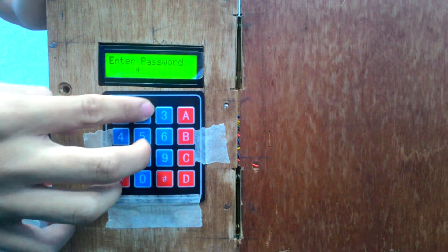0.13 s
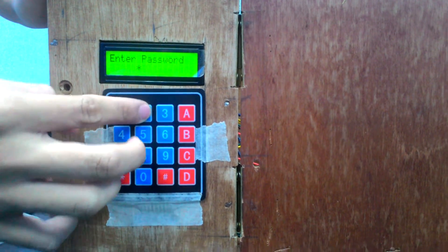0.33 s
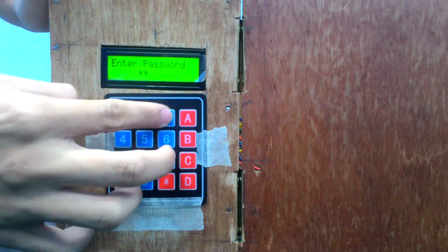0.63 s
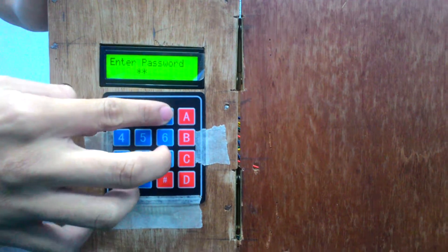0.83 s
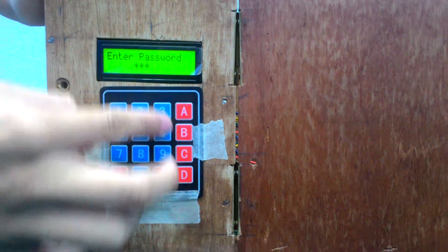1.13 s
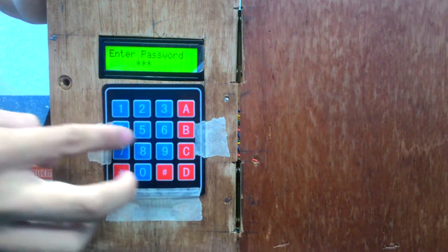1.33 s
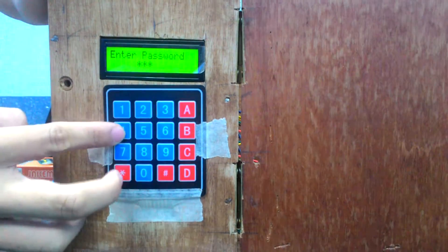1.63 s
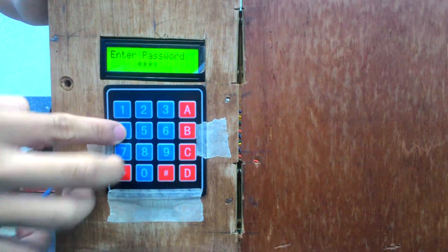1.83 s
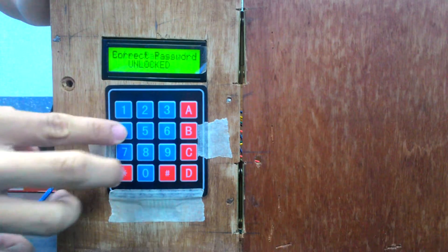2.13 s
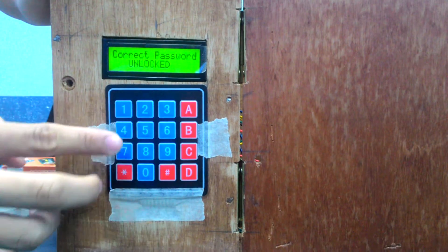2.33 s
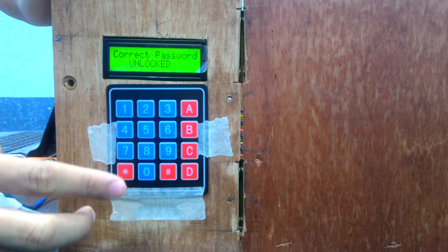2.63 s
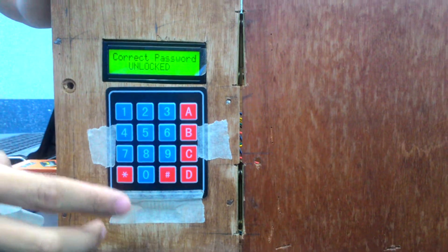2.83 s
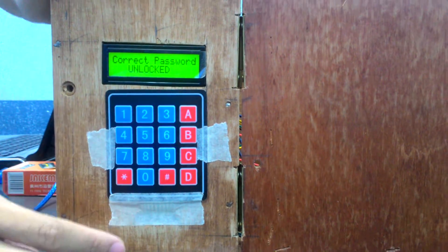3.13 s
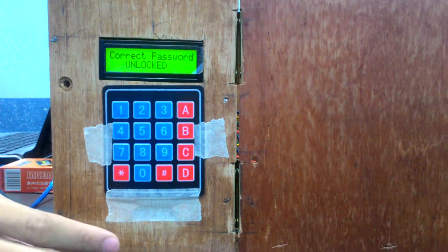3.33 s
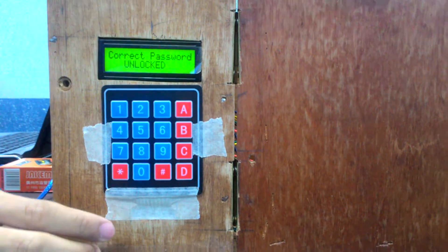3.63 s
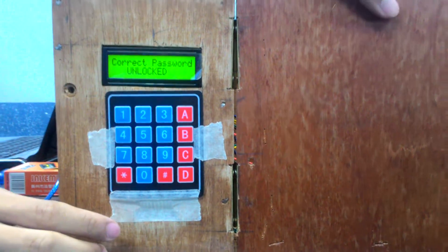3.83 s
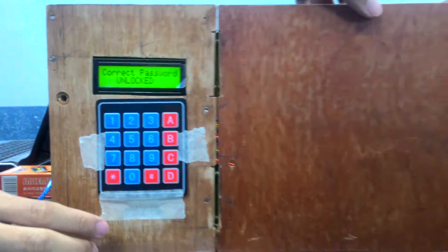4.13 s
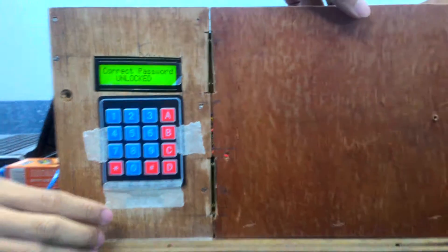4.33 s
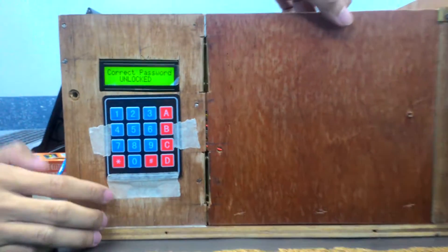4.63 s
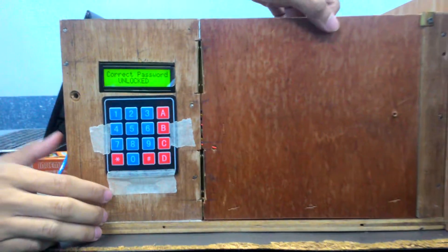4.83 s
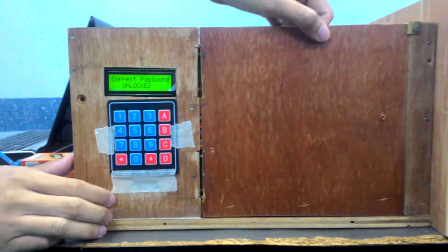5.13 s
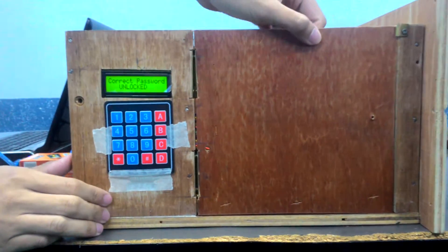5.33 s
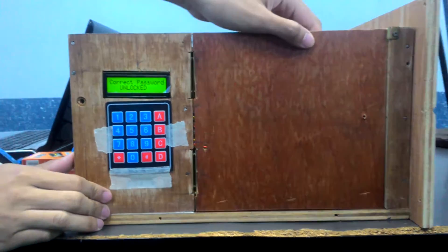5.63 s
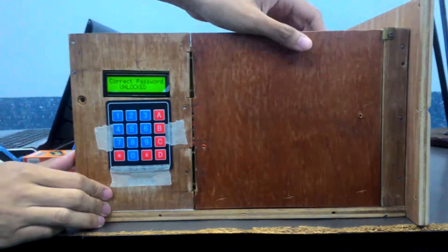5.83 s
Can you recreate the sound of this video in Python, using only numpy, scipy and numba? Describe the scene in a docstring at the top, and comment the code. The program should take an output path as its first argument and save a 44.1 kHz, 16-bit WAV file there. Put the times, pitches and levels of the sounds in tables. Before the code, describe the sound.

Faint finger ticks and rubs on a keypad, then a door is pulled and a small lock bolt snaps with a loud, sharp clack.

```python
"""Keypad and door lock

In a quiet, faintly humming room, fingers press a flat keypad taped to a plywood door and hands shift
over the wood. The door is pulled: a thin squeak, then the bolt of a small electric lock slides and slams
home. The sharp clack rings in the room, overloads the microphone and makes it turn its volume down."""
import sys
import numpy as np
from scipy import signal
from scipy.fft import rfft, irfft
from scipy.io import wavfile
from scipy.ndimage import uniform_filter1d
from numba import njit

SR = 44100
rng = np.random.default_rng(int(sys.argv[2]) if len(sys.argv) > 2 else 0)


def transcribe(u):
    """Save the signal u as a 16-bit wav file named by the first command-line argument.

    u: samples, shape (n,) or (channels, n), limited to [-1, 1]; the rate is SR.
    q: integer samples, one column per channel.
    """
    v = np.clip(np.atleast_2d(u).T, -1, 1)
    q = np.round(v * 32767).astype(np.int16)
    wavfile.write(sys.argv[1], SR, q)


N = 264600
TIME = np.arange(N) / SR

# Hum of the mains and a fan. Each row: pitch in Hz, average level in dB.
HUM_TONES = [(59, -64), (120, -62.5), (289, -76.5), (347, -70), (402, -73.5), (533, -71), (1201, -68.5)]
# The tone colours of the noises. Each row: frequency in Hz, relative level in dB.
AIR_COLOUR = [(20, -13), (45, -6.5), (90, -8), (200, -4), (300, -10.5), (650, -17.5), (850, -15.5),
              (2000, -21), (2900, -19.5), (3650, -11), (5500, -27.5), (6800, -21.5), (8300, -37.5),
              (11000, -38), (15500, -35.5)]
BUMP_COLOUR = [(40, -22.5), (80, 0.5), (120, -3), (220, 2), (320, -18), (600, -24.5), (1500, -39.5),
               (5000, -81.5)]
THUD_COLOUR = [(20, -10.5), (55, 9.5), (80, 5), (120, -13.5), (250, -29), (1500, -90)]
PALM_COLOUR = [(600, -60), (2000, -42), (3800, 3), (5300, -16), (6800, 5), (7500, -2), (8400, -23),
               (9600, -11.5), (11000, -33), (15000, -33.5)]
DRAG_COLOUR = [(300, -13), (1000, -4), (1800, -12.5), (2500, -6.5), (3600, 4.5), (5000, -26), (6600, -6.5),
               (8000, -33.5), (12000, -39.5)]
TICK_COLOUR = [(300, -15), (1000, -13.5), (2000, -11.5), (3700, 2), (5000, 1), (7000, -3), (9500, -13),
               (11500, -32), (15500, -37.5)]
FINGER_ECHO_COLOUR = [(100, -2.5), (700, -4), (3500, 0.5), (8000, -8), (15000, 4.5)]
CRACK_COLOUR = [(30, -21.5), (200, -12), (330, -42), (500, -15), (1000, -17), (1900, -14.5), (2600, -16),
                (3900, 3.5), (5400, -11.5), (7000, 0.5), (8200, -24.5), (10000, -20), (15000, -26.5)]
LOCK_ECHO_COLOUR = [(60, -13.5), (330, -9), (700, -7), (1150, -9), (1850, -12), (2350, 0), (3850, -2.5),
                    (4800, -3), (5200, 3), (5950, -2.5), (7100, -1.5), (7900, -5.5), (10100, 2),
                    (11200, -9.5), (15500, -4.5)]
# Hands rest on the plywood box to type, then grip its door.
# Each holds: start, end, rise time and fall time in seconds, level in dB.
TYPING_HOLD = (-0.5, 4, 0.5, 0.6, -57.5)
DOOR_HOLD = (4, 5.9, 0.3, .3, -55)
# Pushes rock the box on its table. Each row: start and length in seconds, level in dB, pitch in Hz.
BOX_PUSHES = [(0.031, .4, -48, 61), (.28, .24, -53, 150), (.621, .18, -57, 60), (1.64, .26, -53, 65),
              (1.954, .076, -50.5, 65), (2.279, .15, -51.5, 60), (2.42, .29, -52, 60), (2.5, .2, -56, 190),
              (2.843, .12, -58.5, 60), (3.49, .082, -53, 60), (3.759, .34, -51, 175),
              (4.19, .24, -46.5, 130), (4.53, .1, -46, 118), (5.08, .17, -52, 130)]
# Skin slips over keys and wood. Each row: start and length in seconds, level of the rasp in dB,
# then hiss and panel murmur in dB compared with the rasp.
SKIN_RUBS = [(.012, .072, -46, -4, -8), (.613, 0.039, -54, 2.5, -3), (1.175, 0.03, -53, -1, 1),
             (1.442, 0.024, -65, 3, -6), (1.527, 0.056, -63, -4, -4), (1.642, 0.048, -55, -2.5, -9),
             (2.031, .056, -54, -19, -7), (2.589, .1, -57, -14, 0), (3.32, .11, -50.5, -11, -6),
             (3.422, .016, -59, 13, -1), (5.968, .045, -43, 6, -1)]
# A finger scuffs the panel; the box and door creak and rub.
# Each row: start and length in seconds, level in dB, centre and width in Hz.
SCUFFS_AND_CREAKS = [(.4595, .009, -44, 4300, 2200), (.459, .035, -51, 850, 500),
                     (.618, .016, -44, 3640, 500), (2.12, .24, -71, 5280, 140),
                     (4.65, 0.28, -63.5, 2555, 120), (4.85, 0.29, -68, 960, 160),
                     (5.40, .14, -54, 5700, 600), (5.43, .11, -48.5, 4360, 700),
                     (5.43, 0.094, -60, 987, 160)]
# Where the plywood rings. Each row: pitch and width in Hz, strength in dB before dividing by the width.
PANEL_RESONANCES = [(176, 25, -2), (350, 57, -3), (797, 160, 10), (1120, 200, 6)]
# Fingers tick on keys and wood. Each row: start in seconds, level in dB,
# brightness in dB per octave, knock in dB compared with the tick.
FINGER_TICKS = [(.0453, -47, -5, -8), (.4612, -42, -4.5, 3), (.4655, -44, -5, 5), (.594, -44, -2, -3),
                (.6215, -47, -4, 4), (.640, -50, -4, 5), (.656, -49, -4, 6), (1.1797, -39, -.5, -5),
                (2.051, -52, 2, -3), (2.166, -49, 3, -19), (2.331, -56, 17, -20), (3.342, -46, -3, -6),
                (3.406, -45, 5, -20), (3.4302, -35, 4.5, -17), (4.109, -47.5, 10, -20),
                (5.023, -52, 5, -26), (5.2875, -47.5, 4, -15)]
# The pull on the door grows until the bolt gives. Each row: time in seconds, effort in dB.
DOOR_PULL = [(4.4, -30), (4.75, -13), (5.36, -11), (5.44, -3.5), (5.515, 1), (5.535, -13)]
# The bolt rasps in its sleeve. Each row: start and length in seconds, level in dB, centre and width in Hz.
BOLT_SLIDE = [(5.5180, 0.0061, -15.5, 3300, 2500), (5.5178, .0105, -18, 5900, 2800),
              (5.5178, 0.015, -32, 1000, 2200), (5.5170, 0.01494, -12, 3850, 390)]
# The bolt hits its stop and bounces. Each row: start in seconds, level in dB.
BOLT_BLOWS = [(5.5312, 14), (5.5358, 13), (5.5384, 7), (5.5438, -0.5), (5.5468, 9)]
# Bolt, frame and box ring. Each row: pitch in Hz, relative level in dB, seconds to fade by 60 dB.
LOCK_TONES = [(52, -5.5, 0.078), (182, -1, .1), (509, -9, .1), (686, -16, 0.18), (1110, -21, 0.5),
              (2390, -15, 0.5), (2880, -15, .45), (3200, -18.5, 0.39), (3320, -19, .48), (3590, 3.5, 0.19),
              (3630, -5.5, .35), (3710, 1, .3), (3810, -1, 0.64), (3917, -8, 0.54), (3830, -3, 0.57),
              (4200, -12.5, .4), (4510, 0, 0.47), (4385, -1, .42), (4562, -1.5, .4), (5100, -6, .42),
              (4830, -8.5, .45), (5454, -6, 0.38), (5660, -4, 0.51), (6230, -7, 0.36), (6820, -8, 0.34),
              (6890, -0.5, 0.416), (6970, -13, 0.21), (7050, -9, 0.52), (7365, -16, .42)]


def gain(db):
    """Turn decibels into a number to multiply by."""
    return 10 ** (np.asarray(db) / 20)


def normalise(x):
    """Scale x to an average (rms) size of 1."""
    return x / np.sqrt(np.mean(x ** 2))


def fade(seconds):
    """A one-second curve that drops by 60 dB in the given time."""
    return np.exp(-np.log(1000) * np.minimum(TIME[:SR] / seconds, 10))


def add(out, start, x):
    """Mix x into out, from start seconds on."""
    i = min(int(start * SR), N - 1)
    out[i:i + len(x)] += x[:N - i]


def tint(x, colour, tilt_db=0):
    """Give x a tone colour, made brighter by tilt_db per octave."""
    hz, db = np.transpose(colour)
    octave = np.log2(np.maximum(np.arange(len(x) // 2 + 1) * SR / len(x), 1))
    curve_db = np.interp(octave, np.log2(hz), db + tilt_db * np.log2(hz))
    return normalise(irfft(rfft(x) * gain(curve_db), len(x)))


def noise(colour, tilt_db=0, size=N):
    """Random noise with a tone colour."""
    return tint(rng.standard_normal(size), colour, tilt_db)


def wander(rate):
    """A drift that heads for a new random value rate times a second."""
    points = rng.standard_normal(1024)
    return np.interp(TIME * rate, np.arange(len(points)), points)


def grit(spread_db, size=N):
    """Friction: many tiny slips of very unequal strength."""
    return normalise(rng.standard_normal(size) * gain(spread_db * rng.standard_normal(size)))


def stroke(x, length):
    """Cut a short, soft-edged swell out of x."""
    n = int(length * SR)
    return normalise(x[-n:] * np.hanning(n))


def slips(rows):
    """Surfaces slip briefly: each row is a swell of friction in one band of pitches."""
    out = np.zeros(N)
    for start, length, db, hz, width in rows:
        edges = np.clip([hz - width / 2, hz + width / 2], 20, SR * .45)
        band = signal.butter(3, edges, 'band', fs=SR, output='sos')
        ringing = signal.sosfilt(band, grit(7.5, size=SR))
        add(out, start, gain(db) * stroke(ringing, length))
    return out


def hold(start, end, rise, fall, db):
    """A level that rises, stays from start to end, then falls."""
    return gain(db) * np.interp(TIME, [start - rise, start, end, end + fall], [0, 1, 1, 0])


def pull_effort():
    """How hard the door is pulled at each moment."""
    seconds, db = np.transpose(DOOR_PULL)
    return gain(np.interp(TIME, seconds, db, left=-150, right=-150))


def background(air_db=-50.5):
    """Soft room air, with mains and fan tones that waver a little."""
    hum = np.zeros(N)
    for hz, db in HUM_TONES:
        peak = np.sqrt(2) * gain(db + 2.5 * wander(2.72))
        hum += peak * np.sin(2 * np.pi * hz * TIME + 0.55 * wander(3.19))
    return noise(AIR_COLOUR) * gain(air_db + .5 * wander(5.23)) + hum


def room_echo(x, colour, fade_s=0.58, treble_fade_s=0.32, split_hz=8000):
    """The walls of a small bare room smear x into an echo; the highest part dies first."""
    tail = noise(colour, size=SR)
    low = signal.sosfilt(signal.butter(4, split_hz, 'low', fs=SR, output='sos'), tail)
    high = signal.sosfilt(signal.butter(4, split_hz, 'high', fs=SR, output='sos'), tail)
    build_up = 1 - fade(0.062)
    echo = (low * fade(fade_s) + high * fade(treble_fade_s)) * build_up
    return signal.fftconvolve(x, echo / np.sqrt(np.sum(echo ** 2)))[:N]


def shudder(hz, size=N, table_pitch_hz=60):
    """The box shakes: a low thudding noise, moved to the pitch hz."""
    return noise([(f * hz / table_pitch_hz, db) for f, db in THUD_COLOUR], size=size)


def hand_rumble():
    """Resting hands bump the box, and each push makes it sway."""
    contact = hold(*TYPING_HOLD) + hold(*DOOR_HOLD)
    out = noise(BUMP_COLOUR) * contact * gain(2.7 * wander(14))
    for start, length, db, hz in BOX_PUSHES:
        add(out, start, gain(db) * stroke(shudder(hz, size=SR), length))
    return out


def palm_swish(peak_s=3.41, rise_s=.16, db=-50, slowing_db_per_s=19.5):
    """A palm lands on the wood and slides to rest."""
    since = TIME - peak_s
    landing = np.clip(1 + since / rise_s, 0, 1) ** 2
    speed = landing * gain(-slowing_db_per_s * np.maximum(since, 0))
    return tint(grit(5.1), PALM_COLOUR) * speed * gain(db + 1.4 * wander(15))


def skin_rubs(hiss_delay=.15):
    """Each rub rasps and stirs the panel; a hiss comes a little later, as the skin lets go."""
    rows = []
    for start, length, db, hiss_db, murmur_db in SKIN_RUBS:
        rasp = (start, length, db, 3880, 1100)
        murmur = (start, length, db + murmur_db, 390, 280)
        hiss = (start + hiss_delay * length, length, db + hiss_db, 7300, 2200)
        rows += [rasp, murmur, hiss]
    return slips(rows)


def panel_knock(size, fade_s=.045):
    """A soft fingertip makes the plywood ring briefly."""
    push = rng.standard_normal(size) * fade(fade_s)[:size]
    ring = np.zeros(size)
    for hz, width, db in PANEL_RESONANCES:
        resonance = signal.iirpeak(hz, hz / width, fs=SR)
        ring += gain(db) * signal.lfilter(*resonance, push) / width
    return ring / np.abs(ring).max()


def fingers(tick_fade_s=.019, echo_db=-5.5, size=4096):
    """Fingers tick on the keys and rub, scuff and knock the panel; the box and door creak and rub."""
    out = skin_rubs() + slips(SCUFFS_AND_CREAKS)
    for start, db, bright_db, knock_db in FINGER_TICKS:
        tick = noise(TICK_COLOUR, bright_db, size) * fade(tick_fade_s)[:size]
        add(out, start, gain(db) * (tick + gain(knock_db) * panel_knock(size)))
    return out + gain(echo_db) * room_echo(out, FINGER_ECHO_COLOUR)


def door_drag(scrape_db=-41.5, groan_db=-45, groan_hz=114):
    """The door scrapes in its frame and groans, louder the harder it is pulled."""
    scrape = tint(grit(7.2), DRAG_COLOUR) * gain(scrape_db + 1.2 * wander(60))
    groan = gain(groan_db) * shudder(groan_hz)
    return (scrape + groan) * pull_effort()


def bolt_squeak(start_s=5.41, start_hz=7280, sag_hz_per_s=2600, db=-44):
    """Steel sticks on steel at the end of the pull: a thin, shaky tone that sinks in pitch."""
    since = np.clip(TIME - start_s, 0, 1)
    jitter = normalise(uniform_filter1d(rng.standard_normal(N), size=30))
    pitch = (start_hz - sag_hz_per_s * since) * (1 + 0.035 * jitter)
    tone = normalise(np.sin(2 * np.pi * np.cumsum(pitch) / SR))
    return tone * (since > 0) * pull_effort() * gain(db + 2.7 * wander(120))


def lock_clack(crack_fade_s=0.029, echo_db=-4.5, ring_db=-10.5):
    """The bolt slides, slams into its stop and bounces; the lock and the room ring on."""
    cracks = slips(BOLT_SLIDE)
    for start, db in BOLT_BLOWS:
        add(cracks, start, gain(db) * noise(CRACK_COLOUR, size=SR) * fade(crack_fade_s))
    out = cracks + gain(echo_db) * room_echo(cracks, LOCK_ECHO_COLOUR)
    # The first, hardest blow sets the steel and the plywood ringing.
    first_blow_s = BOLT_BLOWS[0][0]
    for hz, db, fade_s in LOCK_TONES:
        tone = np.sin(2 * np.pi * (hz * TIME[:SR] + rng.random()))
        add(out, first_blow_s, gain(ring_db + db) * fade(fade_s) * tone)
    return out


def scene():
    """All the sounds add up in one channel."""
    handling = fingers() + hand_rumble() + palm_swish()
    door = door_drag() + bolt_squeak() + lock_clack()
    return (handling + door + background())[None]


@njit
def follow_level(x, attack, release):
    """Track the level of x, rising at the attack rate and sinking at the release rate."""
    out, level = np.empty(len(x)), 0.
    for i in range(len(x)):
        level += (x[i] - level) * (attack if x[i] > level else release)
        out[i] = level
    return out


def record(dry, threshold_db=-12, attack_s=0.028, release_s=4.0, top_hz=15850):
    """The microphone turns itself down too late, so the clack distorts; the highest treble is cut."""
    level = follow_level(np.abs(dry[0]), 1 / (attack_s * SR), 1 / (release_s * SR))
    turned_down = dry / np.maximum(level / gain(threshold_db), 1)
    clipped = turned_down / (1 + turned_down ** 8) ** (1 / 8)  # flattens the tallest peaks
    treble_cut = signal.ellip(10, .1, 80, top_hz, fs=SR, output='sos')
    return signal.sosfilt(treble_cut, .9 * clipped)


dry = scene()
out = record(dry)
transcribe(out)
```